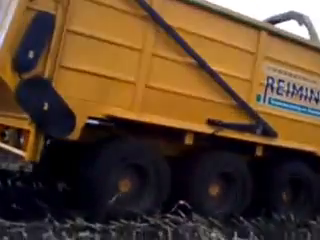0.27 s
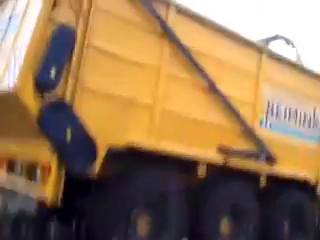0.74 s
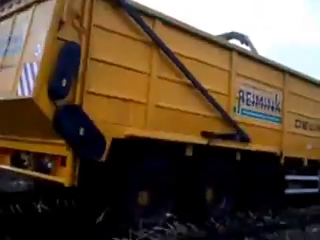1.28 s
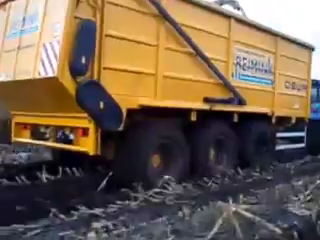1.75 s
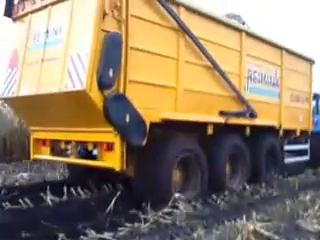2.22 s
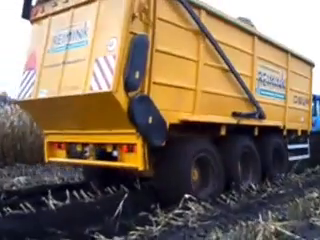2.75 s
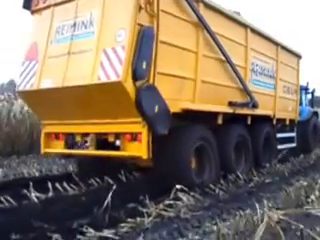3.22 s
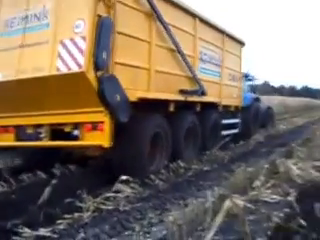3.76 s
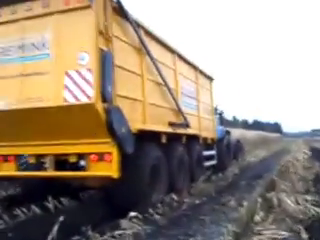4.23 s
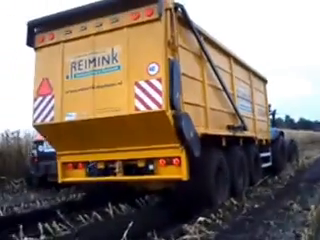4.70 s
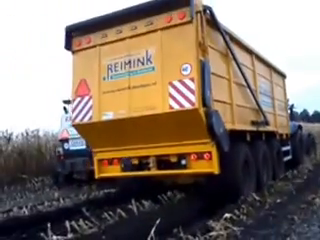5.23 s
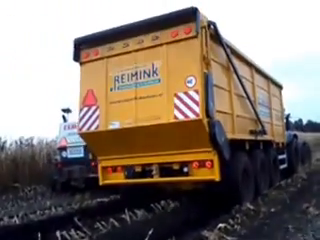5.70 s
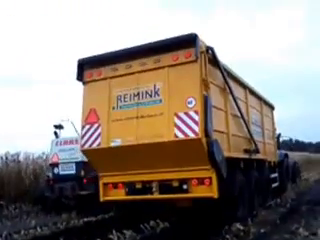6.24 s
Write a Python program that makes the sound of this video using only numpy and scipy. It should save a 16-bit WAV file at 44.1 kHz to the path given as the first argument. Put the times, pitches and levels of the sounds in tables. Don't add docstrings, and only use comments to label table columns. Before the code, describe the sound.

Steady harvester and tractor roar with a wavering drum whine, wind puffs thumping the microphone, then brighter crop hiss and sharp metallic ticks.

```python
import sys
import numpy as np
from scipy import signal
from scipy.fft import rfft, irfft, next_fast_len
from scipy.io import wavfile

SR = 44100
rng = np.random.default_rng(int(sys.argv[2]) if len(sys.argv) > 2 else 0)


def linear_from_db(decibels):
    return 10 ** (np.asarray(decibels, float) / 20)


def store_pcm(level_fs):
    pcm = np.round(np.clip(level_fs, -1, 1) * 32767).astype(np.int16)
    wavfile.write(sys.argv[1], SR, np.atleast_2d(pcm).T)


N = 285327

# multiple of knife rate, shielded level/dB, open level/dB
ENGINE_TONES = [(0.422, -24.5, -23)]


def rms_one(x):
    return x / np.sqrt(np.mean(x ** 2) + 1e-20)


def in_time(rows):
    s, *columns = np.transpose(rows)
    return [np.interp(np.arange(N) / SR, s, c) for c in columns]


def drift(rate):
    r = np.exp(-80 * np.pi * rate / SR)
    slow = signal.lfilter([1], [1, -2 * r, r * r], rng.standard_normal(N // 40 + 2002))[2000:]
    return np.interp(np.arange(N) / 40, np.arange(len(slow)), rms_one(slow))


def coloured(spectrum, patchy_db, count):
    size = next_fast_len(N)
    log_hz = np.log(np.arange(size // 2 + 1) * SR / size + 1)
    hz, level_db = np.transpose(spectrum)
    colour = linear_from_db(np.interp(log_hz, np.log(hz), level_db, -99, -99))
    shaped = rfft(rng.standard_normal(size)) * colour
    centres = np.linspace(np.log(hz[0]), np.log(hz[-1]), count)
    out = np.zeros(N)
    for row in np.eye(count):
        band = irfft(shaped * np.interp(log_hz, centres, row), size)[:N]
        out += band * linear_from_db(patchy_db * (drift(15) + drift(3.4)))
    return rms_one(out)


def resonate(x, hz, width):
    r = np.exp(-np.pi * width / SR)
    top = np.array([1, 0, -1]) * (1 - r * r) / 2
    return signal.lfilter(top, [1, -2 * r * np.cos(2 * np.pi * hz / SR), r * r], x + 1e-18)


def tones(turns, orders, view, fade_db, sway):
    out = np.zeros(N)
    for multiple, shielded_db, open_db in orders:
        level_db = shielded_db + view * (open_db - shielded_db) + fade_db * drift(3.4)
        phase = 2 * np.pi * (multiple * turns + rng.random()) + sway * np.sqrt(multiple) * drift(3.1)
        out += np.sqrt(2) * linear_from_db(level_db) * np.sin(phase)
    return out


def shafts():
    # t/s, knife passes on the chopper drum f/Hz, tractor firing f/Hz
    speeds = [(0, 204, 76.5), (.3, 206, 78), (.7, 211, 82), (1.1, 214, 84), (1.5, 218, 85.5),
              (1.9, 221.5, 84.3), (2.3, 223, 84.3), (3.5, 224, 84), (4.3, 226, 85), (4.7, 227.5, 86),
              (5.1, 230.2, 88), (5.6, 231.6, 89), (5.9, 230.7, 90), (6.47, 232, 90.5)]
    knife_hz, firing_hz = in_time(speeds)
    return np.cumsum(knife_hz) / SR, np.cumsum(firing_hz) / SR


def sight_line():
    # t/s, share in open view [0-1], whine level/dB
    path = [(0, 0.1, -13), (.6, 0, -0.5), (1.2, 0.04, -1.5), (1.75, 0, 0), (2.0, 0.36, 0.5),
            (2.8, 0.07, 1.5), (3.4, 0.08, -3), (3.7, 0.4, -8.5), (4.3, 0, -2), (4.7, 0.76, 0.5),
            (5.1, 0.92, 2.5), (5.6, 1, 1), (5.8, 1, 0.5), (6.1, 1, 1), (6.47, 1, -3.5)]
    view, whine_db = in_time(path)
    return np.clip(view, 0, 1), whine_db


def puff_train(turbulence):
    # t/s, peak level/dB, pitch f/Hz
    soft_puffs = [(0.047, -1.5, 530), (0.089, -3, 397), (0.128, -8, 660), (0.582, -3, 620), (0.757, 2, 390),
                  (0.784, -2.5, 560), (0.816, -5.5, 660), (0.906, -4.5, 470), (0.975, -6, 444),
                  (1.065, -6, 350), (1.244, -7, 506), (1.285, -8.5, 447), (1.375, -2, 414), (3.83, -4, 713),
                  (4.058, -11, 441), (3.602, -6.5, 369), (3.577, -9, 457), (3.592, -2, 410),
                  (3.622, -1, 660), (3.648, -5.5, 482), (3.776, 1, 406), (3.786, 2.5, 338), (3.85, -4, 746),
                  (3.923, 2, 710), (3.94, 2, 703), (3.963, 2, 620), (4.02, 6.5, 430), (4.043, 2, 452),
                  (4.078, -4.5, 386), (4.253, -5.5, 636)]
    # t/s, peak level/dB, pitch f/Hz
    slaps = [(1.363, 0, 512), (3.865, -9.5, 583), (3.892, -2, 563), (3.953, 2, 694), (4.002, -1.5, 592)]
    rows = [(*row, -25.5) for row in soft_puffs] + [(*row, -12.5) for row in slaps]
    out, t = np.zeros(N), np.arange(SR // 25) / SR
    grit = rms_one(resonate(rng.standard_normal(N), hz=1490, width=620))
    chance = rng.random((len(rows), 3))
    for (s, peak_db, hz, crack_db), (phase, length, bend) in zip(rows, chance):
        at, rise = int(s * SR), (1.14 + 0.5 * length) / hz
        shape = (t / rise) ** 2 * np.exp(2 - 2 * t / rise)
        cycles = hz * t * (1 + 0.3 * (bend - 0.7) * (t / rise - 2))
        push = 0.8 * np.cos(2 * np.pi * phase) * np.sqrt(shape)
        ring = shape * np.sin(2 * np.pi * (cycles + phase))
        flutter = 0.74 * np.sqrt(shape) * turbulence[at + len(t):at + 2 * len(t)]
        crack = linear_from_db(crack_db) * shape ** 1.4 * rms_one(grit[at:at + len(t)])
        out[at:at + len(t)] += linear_from_db(peak_db - 5.5) * (push + ring + flutter) + crack
    return out


def wind():
    # middle t/s, half length [s], level/dB
    gusts = [
        (0.082, .08, -21.5),
        (1.102, 0.45, -21),
        (3.65, 0.1, -25),
        (3.942, 0.13, -10.5),
        (4.2, 0.19, -22),
    ]
    # f/Hz, level/dB per Hz
    wind_colour = [(30, -8), (100, -0.5), (250, 3), (450, -0.5), (870, -9.5), (1200, -9.5), (2000, -24),
                   (2700, -28), (4000, -47.5)]
    clock = np.arange(N) / SR
    gust = sum(linear_from_db(level_db) * np.exp(-((clock - middle) / half) ** 4) for middle, half, level_db in gusts)
    breeze = linear_from_db(-36 + 4 * drift(3))
    turbulence = coloured(wind_colour, patchy_db=1.0, count=5)
    return (gust + breeze) * linear_from_db(2.74 * drift(60)) * turbulence + puff_train(turbulence)


def carried_whines():
    # middle t/s, half length [s], f/Hz, level/dB
    whine_rows = [(0.063, 0.12, 3160, -26), (0.355, 0.39, 768, -29), (0.75, .3, 3100, -32),
                  (0.6, .3, 4780, -33), (1.3, .4, 3260, -33.5), (1.6, .1, 1800, -30),
                  (1.85, .15, 1760, -32), (1.95, 0.17, 2900, -29.5), (2.35, .35, 1356, -29),
                  (2.75, 0.35, 3000, -29.5), (3.11, 0.18, 6110, -27), (4.36, 0.08, 4020, -29),
                  (4.8, .15, 1894, -29), (4.88, 0.2, 4450, -28), (5.07, .15, 3980, -24.5),
                  (5.95, .25, 1923, -26), (6.1, 0.4, 3720, -24), (6.24, 0.18, 4130, -23),
                  (6.36, 0.2, 698, -23.5), (.66, .15, 1680, -33), (6.0, .2, 635, -26),
                  (5.95, .08, 1400, -28), (.35, .3, 2300, -34), (2.35, .2, 3100, -32),
                  (5.92, .1, 4950, -24), (6.3, .2, 1900, -29)]
    out, clock = np.zeros(N), np.arange(N) / SR
    for middle, half, hz, level_db in whine_rows:
        width = 60 * (hz / 1000) ** 0.5
        glide = -0.02 * hz
        near = np.abs(clock - middle) < 2 * half
        t = clock[near] - middle
        r = np.exp(-np.pi * width / SR)
        chance = rng.standard_normal((2, len(t) + SR // 10))
        slow = signal.lfilter([1], [1, -2 * r, r * r], chance)[:, SR // 10:]
        phase = 2 * np.pi * (hz * t + glide * t ** 2 / 2)
        band = slow[0] * np.cos(phase) + slow[1] * np.sin(phase)
        out[near] += linear_from_db(level_db) * np.exp(-(t / half) ** 2) * rms_one(band)
    return out


def tractor_tones(tractor, view):
    # multiple of firing rate, shielded level/dB, open level/dB
    firing = [
        (1, -25.5, -47.5),
        (2, -35.5, -47.5),
    ]
    return tones(tractor, firing, view, fade_db=1.2, sway=0.36)


def spatter():
    # t/s, peak level/dB
    strikes = [(4.4047, -1.5), (4.4214, 3.5), (4.4312, 3), (4.4444, -11), (4.4567, -3.5), (4.5013, 5),
               (4.5104, -15), (4.927, -1), (5.2184, -4), (5.231, 4), (5.257, -8), (5.3115, -7),
               (5.4648, -5), (5.6034, 3), (5.6674, 0.5), (5.6954, -1), (5.7125, 3), (5.7704, 1),
               (6.2723, -10.5), (6.3024, -4), (6.3756, -11), (6.3963, 3), (6.4177, -7.5), (6.4365, 3)]
    out, t = np.zeros(N), np.arange(SR // 100) / SR
    shape = t / 0.00086 * np.exp(1 - t / 0.00047) + 0.27 * np.exp(-t / 0.0015)
    chance = rng.random((len(strikes), 2))
    for (s, peak_db), (pitch, phase) in zip(strikes, chance):
        tick = shape * np.sin(2 * np.pi * ((5900 + 1000 * pitch) * t + phase))
        at = int(s * SR)
        out[at:at + len(t)] += linear_from_db(peak_db - 0.5) * tick
    return out


def panels(view):
    # f/Hz, width [Hz], shielded level/dB, open level/dB
    resonances = [(660, 128, -33, -28), (1915, 130, -38.5, -33), (2955, 710, -26.5, -41),
                  (5910, 190, -45.5, -34.5), (6220, 100, -41, -22.5)]
    out = np.zeros(N)
    for hz, width, shielded_db, open_db in resonances:
        once = resonate(rng.standard_normal(N), hz, width)
        band = rms_one(resonate(once, hz, width))
        out += band * linear_from_db(shielded_db + view * (open_db - shielded_db) + 1.9 * drift(0.96))
    return out


def crop_stream(drum, tractor, view):
    # t/s, level/dB
    flow = [(0, -21.5), (.65, -18.5), (.9, -20), (1.45, -18), (3.8, -19), (3.93, -16), (4.25, -17),
            (4.42, -13.5), (4.7, -16), (5.05, -13.5), (5.2, -13.5), (5.27, -8), (5.33, -13.5),
            (5.68, -12.5), (5.93, -7), (6.08, -8.5), (6.28, -13.5), (6.47, -10.5)]
    # f/Hz, level/dB per Hz
    roar_colour = [(30, -12.5), (60, 13.5), (100, 5.5), (160, 2.5), (250, 1.5), (400, 3), (600, 0.5),
                   (900, 2), (1100, -10.5), (1500, -11)]
    clatter_colour = [(700, -23.5), (1000, -3), (1300, -0.5), (1700, -1.5), (2100, -4), (2500, -4),
                      (2900, -14.5), (3600, -31)]
    rush_colour = [(2000, -33), (2600, -8.5), (3000, -2), (3600, 1), (4300, -3), (4800, -11.5), (5800, -24)]
    hiss_colour = [(3800, -13), (4500, -7), (5200, -4), (5700, -2.5), (6100, 1), (6600, -1), (7000, -5.5),
                   (7450, -24), (7900, -52), (8300, -40.5)]
    engine = ENGINE_TONES[0][0] * drum
    fire = np.cos(2 * np.pi * engine) + np.cos(2 * np.pi * tractor)
    lope = np.cos(2 * np.pi * engine / 3)
    swing_db = in_time(flow)[0] + 16
    roar_db = -25 + 0.19 * swing_db + 0.38 * view
    clatter_db = -22 + 0.32 * swing_db + 1.5 * view
    rush_db = -22.5 + 0.38 * swing_db + 3.8 * view
    hiss_db = -16.5 + 0.96 * swing_db + 0.1 * view
    roar = linear_from_db(roar_db + 3 + 0.81 * lope + 0.23 * fire) * coloured(roar_colour, patchy_db=1.63, count=8)
    clatter = linear_from_db(clatter_db - 2.03 + 0.71 * lope + 0.33 * fire)
    clatter *= coloured(clatter_colour, patchy_db=0.13, count=5)
    rush = linear_from_db(rush_db - 2.76 + 0.24 * fire) * coloured(rush_colour, patchy_db=0.6, count=4)
    hiss = linear_from_db(hiss_db + 0.3 + 0.37 * fire) * coloured(hiss_colour, patchy_db=0.41, count=5)
    return roar + clatter + rush + hiss


def harvester_tones(drum, view, whine_db):
    # multiple of knife rate, shielded level/dB, open level/dB
    drum_tones = [(1, -23, -33), (2, -34, -30), (3, -36, -36), (4, -33, -29), (6, -40, -41),
                  (2 / 3, -36, -38), (4 / 3, -39, -33)]
    gear_tones = [(0.702, -40.5, -37.5), (1.835, -54.5, -35), (2.185, -46.5, -35), (2.256, -57.5, -35.5),
                  (3.619, -46.5, -34.5)]
    knives = linear_from_db(whine_db) * tones(drum, drum_tones, view, fade_db=1.9, sway=0.55)
    gears = tones(drum, gear_tones, view, fade_db=2.0, sway=0.45)
    engine = tones(drum, ENGINE_TONES, view, fade_db=0.8, sway=0.3)
    return knives + gears + engine


def scene():
    drum, tractor = shafts()
    view, whine_db = sight_line()
    air = wind() + carried_whines()
    harvester = harvester_tones(drum, view, whine_db) + crop_stream(drum, tractor, view) + panels(view)
    return (air + tractor_tones(tractor, view) + spatter() + harvester)[None]


def roll_off(x):
    return signal.sosfilt(signal.butter(12, 15800, fs=SR, output="sos"), x)


def record(dry):
    notch, port = 2 * np.pi * 236, 2 * np.pi * 350
    x = signal.lfilter(*signal.bilinear([1, 40, notch ** 2], [1, port / 1.25, port ** 2], SR), dry)
    x = signal.sosfilt(signal.butter(2, 307, "high", fs=SR, output="sos"), x)
    x = np.clip(x, -1.1, 0.91)
    x = signal.sosfilt(signal.ellip(12, 0.1, 90, 7850, fs=SR, output="sos"), x)
    x = np.clip(x, -1, 1)
    return roll_off(x)


dry = scene()
out = record(dry)
store_pcm(out)
```